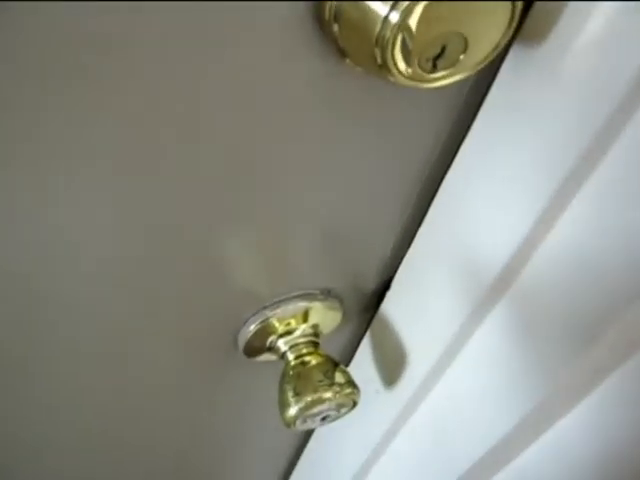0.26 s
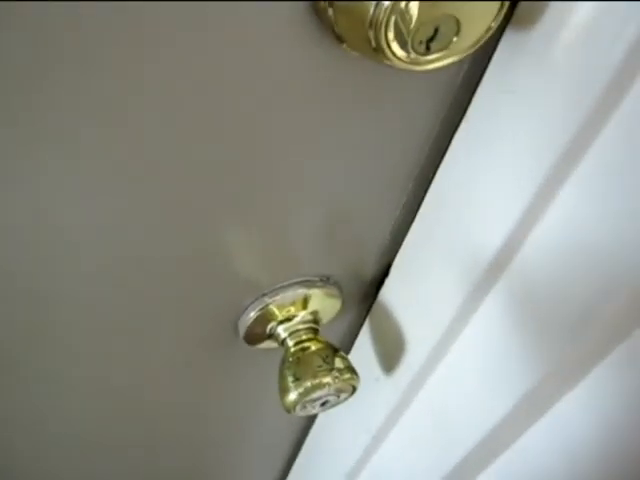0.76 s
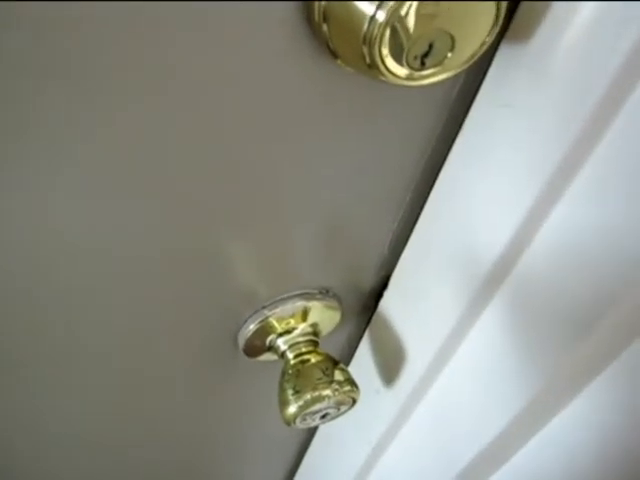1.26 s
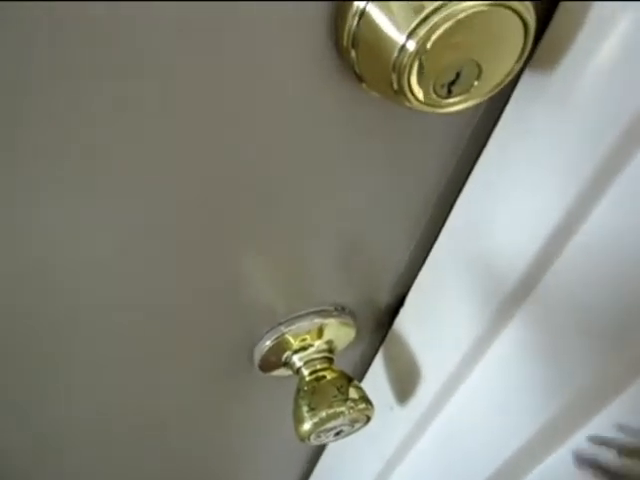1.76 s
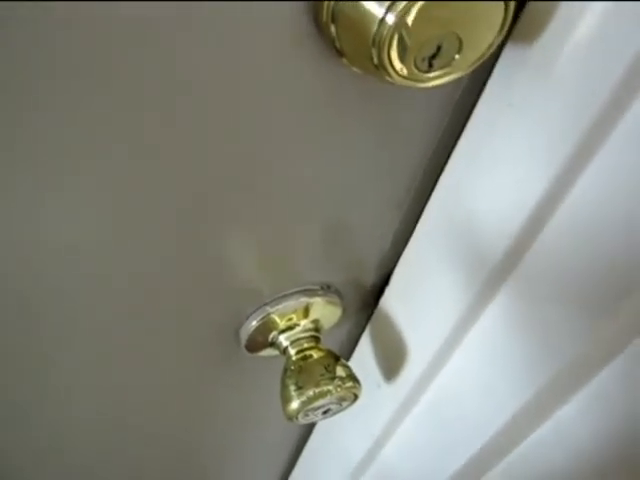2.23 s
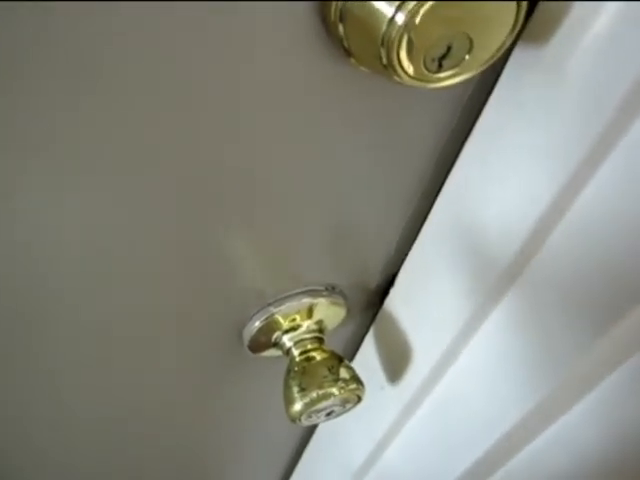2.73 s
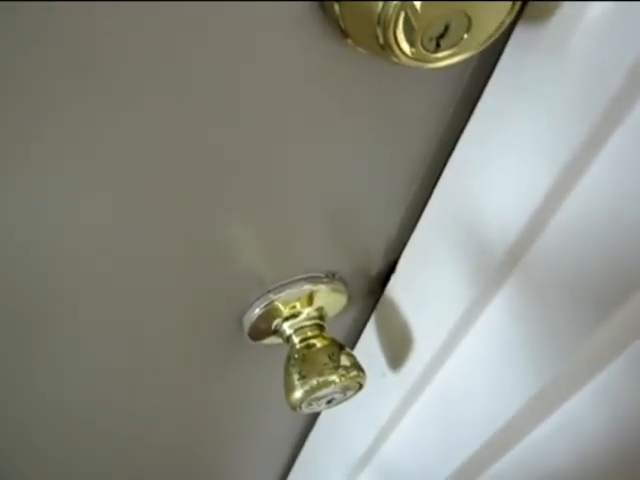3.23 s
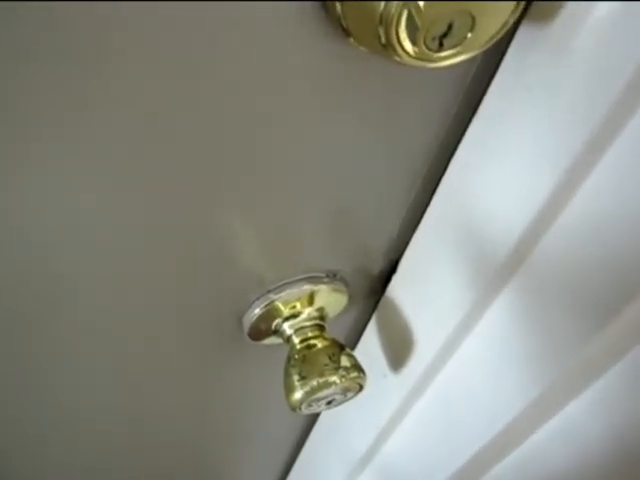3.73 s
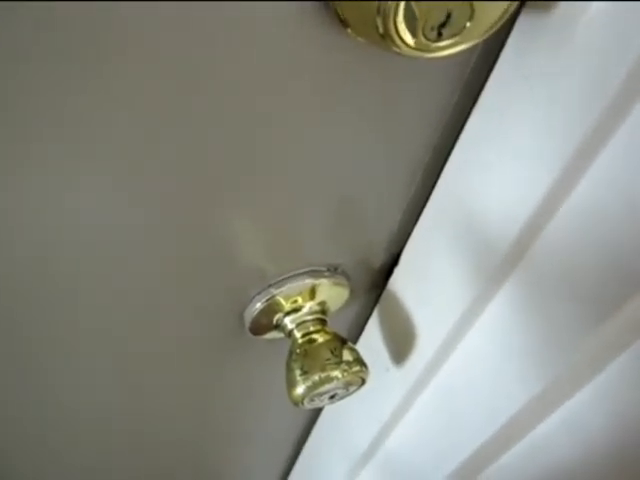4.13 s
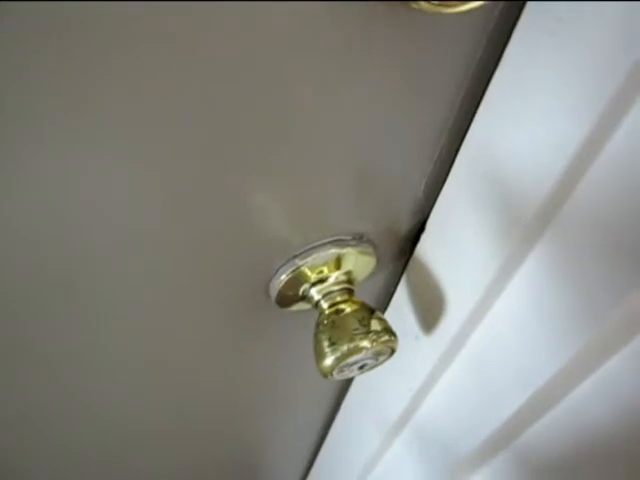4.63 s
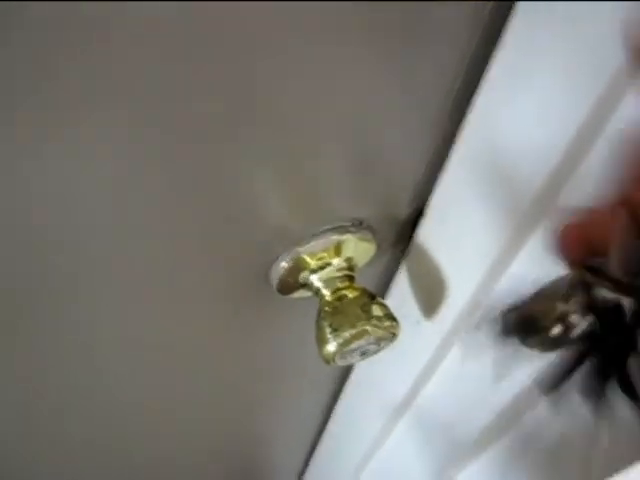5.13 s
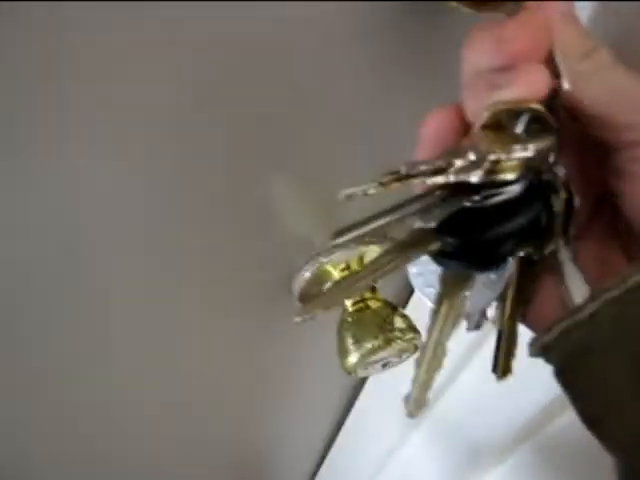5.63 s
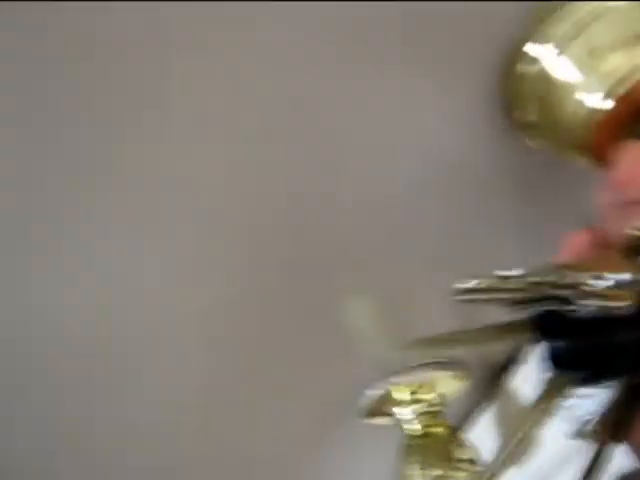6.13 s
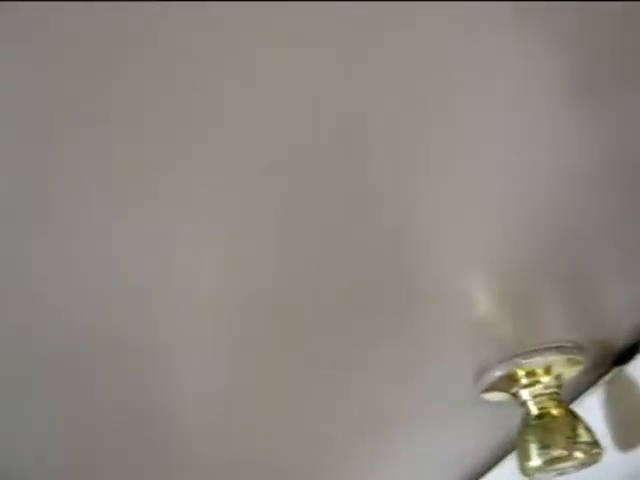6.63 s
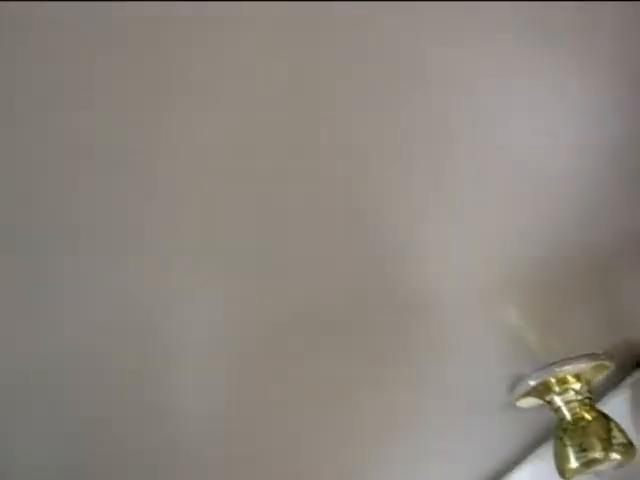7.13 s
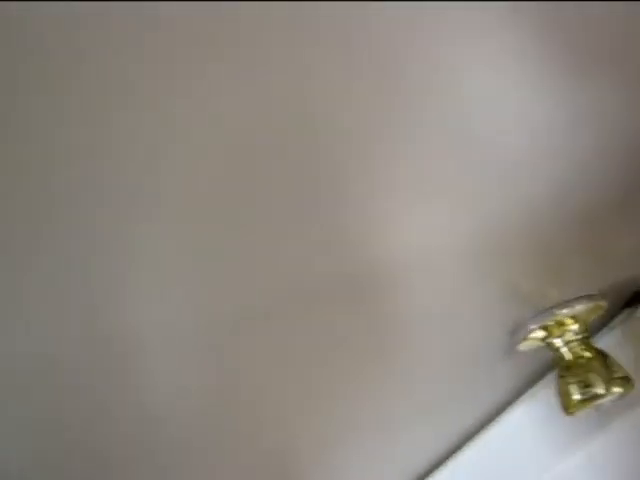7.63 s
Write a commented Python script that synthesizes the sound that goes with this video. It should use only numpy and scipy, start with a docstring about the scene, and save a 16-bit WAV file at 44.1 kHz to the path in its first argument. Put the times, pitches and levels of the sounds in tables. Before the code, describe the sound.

Close, gritty rustling cloth with bright key clicks and a brief scrape, then a key strikes a lock and the door booms open.

```python
"""Keys click, scrape and ring as they are dug out of a pocket beside a small camera: damped metal partials over noise.
A key goes into the lock, the bolt knocks over and the door thumps open (struck modes); cloth rustles (tiny slips).
The hand rumbles on camera and door; a low hum and a thin whine sink away when the rustle falls quiet.
The camera stores sound at a low rate in coarse steps: quiet sounds crackle, the quietest drop to silence."""
import sys
import numpy as np
from scipy import signal
from scipy.fft import rfft, irfft, next_fast_len
from scipy.io import wavfile
from scipy.ndimage import map_coordinates

SR = 44100
rng = np.random.default_rng(int(sys.argv[2]) if len(sys.argv) > 2 else 0)


def unload_wav(signal):
    """Save mono or channel-first audio to the path in sys.argv[1] as 16-bit WAV at rate SR, clipped to [-1, 1]."""
    wavfile.write(
        sys.argv[1],
        SR,
        np.round(np.clip(np.atleast_2d(signal).T, -1, 1) * 32767).astype(np.int16),
    )


N = 347067
TIME = np.arange(N) / SR
DECIMATE, STEP = 4, .0177  # stored: every 4th sample, in steps of this amplitude
STORED_TOP_HZ = SR / DECIMATE / 2
HELD_FROM_S, HELD_UNTIL_S = 5.35, 7.3  # the bunch is held to the lock
SPAN_ATTACK_S, SPAN_RELEASE_T60_S = 0.017, .06
BRUSH_ATTACK_S, BRUSH_RELEASE_T60_S = 0.0081, 0.072


def amp(db):
    """Decibels to gain."""
    return 10 ** (np.asarray(db) / 20)


def unit(x):
    """Scale to rms 1."""
    return x / np.sqrt(np.mean(x ** 2) + 1e-20)


def curve(rows):
    """One value per sample from (s, value) rows."""
    return np.interp(TIME, *np.transpose(rows))


def wobble(rate_hz):
    """Smooth random curve, rate_hz knots a second."""
    knots = rng.standard_normal(int(N * rate_hz / SR) + 4)
    return map_coordinates(knots, [TIME * rate_hz])


def filtered(x, response):
    """Multiply the spectrum of x by a response of frequency."""
    m = next_fast_len(len(x) + 4096)
    hz = np.fft.rfftfreq(m, 1 / SR)
    return irfft(rfft(x, m) * response(hz), m)[:len(x)]


def coloured(x, points):
    """Filter x by (Hz, dB) points on a log frequency axis."""
    point_hz, db = np.transpose(points)
    return filtered(x, lambda hz: amp(np.interp(np.log(hz + 1), np.log(point_hz), db)))


def resonance(f, centre_hz, width_hz):
    """Causal band-pass response of one resonance."""
    return 1j * f * width_hz / (centre_hz ** 2 - f ** 2 + 1j * f * width_hz)


def add(track, start_s, sound):
    """Mix a sound into the track at start_s."""
    room = track[round(start_s * SR):][:len(sound)]
    room += sound[:len(room)]


def held_to_lock():
    """True while the bunch is held to the lock."""
    return (TIME > HELD_FROM_S) & (TIME < HELD_UNTIL_S)


def friction(rate_hz, life_s, spread_db, smooth):
    """Noise of rms 1 made of tiny slips, each a puff that dies fast, over a smooth share."""
    slip_db = spread_db * np.clip(rng.standard_normal(N), -2, 2)
    slips = (rng.random(N) < rate_hz / SR) * amp(slip_db) ** 2
    power = signal.lfilter([1], [1, -np.exp(-2 / (life_s * SR))], slips)
    return unit(np.sqrt(power / power.mean() + smooth) * rng.standard_normal(N))


def span_gain(rows, attack_s, release_t60_s):
    """Gain of spans that set in, rise or fall evenly in dB, then die away; their powers add."""
    power = np.zeros(N)
    for start_s, length_s, level_db, swell_db in rows:
        t = TIME - start_s
        swell = swell_db * (np.clip(t / length_s, 0, 1) - 1)
        release = -60 * np.clip((t - length_s) / release_t60_s, 0, 2)
        power += (np.clip(t / attack_s, 0, 1) * amp(level_db + swell + release)) ** 2
    return np.sqrt(power)


def struck(blows, modes, trim_db, scatter_db, attack_s=.0001, longest_t60_s=1):
    """Every blow rings the same modes at new strengths and random polarity."""
    out, t = np.zeros(N), np.arange(SR // 2) / SR
    for start_s, level_db in blows:
        ring = np.zeros(len(t))
        for hz, mode_db, t60_s in modes:
            sign = rng.choice([-1, 1])
            fade_db = -60 * t / min(t60_s, longest_t60_s)
            strength_db = mode_db + scatter_db * rng.standard_normal()
            ring += sign * amp(strength_db + fade_db) * np.sin(2 * np.pi * hz * t)
        add(out, start_s, amp(level_db + trim_db) * (1 - np.exp(-t / attack_s)) * ring)
    return out


# hum ceiling: time_s, level_db
HUM_LEVEL = [(0, -65), (1, -53.5), (1.4, -61.5), (3, -55.5), (3.6, -45.5), (4.6, -41), (5.3, -63.5),
             (5.7, -56), (6.3, -43.5), (6.8, -55.5), (7.87, -60)]


def hum(rustle_gain, low_hz=65.4, high_hz=105, high_db=-9, under_db=-2):
    """Two low sines, capped below the rustle gain, so they sink away when it falls."""
    tone = np.sin(2 * np.pi * low_hz * TIME) + amp(high_db) * np.sin(2 * np.pi * high_hz * TIME)
    return np.minimum(amp(curve(HUM_LEVEL)), rustle_gain * amp(under_db)) * unit(tone)


def whine(rustle_gain, low_hz=3145, high_hz=3175, under_db=-10, loudest_db=-51, flutter_rad=.15, waver_db=1.5):
    """Two close, fluttering sines that sink away when the rustle falls quiet."""
    pair = np.zeros(N)
    for hz in (low_hz, high_hz):
        flutter = flutter_rad * (wobble(30) + wobble(300))
        pair += np.sin(2 * np.pi * hz * TIME + flutter)
    level = np.minimum(rustle_gain * amp(under_db), amp(loudest_db))
    return level * unit(amp(waver_db * wobble(16)) * pair)


# rumble spectrum: freq_hz, density_db (per Hz, relative)
RUMBLE_SPECTRUM = [(20, -16.5), (45, -6), (80, -4), (110, -1), (160, -1.5), (200, -5), (320, -6),
                   (500, -17), (1200, -36.5)]
# rumble gain on the rustle gain: time_s, gain_db
SHAKE_GAIN = [(0, -9), (1.1, -5.5), (1.4, -8.5), (2.6, -0.5), (3, -5), (4.5, -2.5), (5.15, -9.5),
              (5.45, -2.5), (5.66, 3), (5.95, 3), (6.3, 0), (6.8, -1.5), (7.15, 3), (7.4, 1), (7.87, -4.5)]


def handling(spans, brushes, brush_db=-3.5, lumps_db=2.5):
    """Hand on camera and door: low, lumpy noise that follows the rustle gain, less for brushes."""
    shake = np.hypot(spans, amp(brush_db) * brushes) * amp(curve(SHAKE_GAIN))
    lumps = amp(lumps_db * wobble(40))
    return shake * unit(lumps * coloured(rng.standard_normal(N), RUMBLE_SPECTRUM))


# cloth spectrum: freq_hz, density_db (per Hz, relative)
CLOTH_SPECTRUM = [(60, -37.5), (300, -2), (700, 1), (1500, -1), (2400, 3), (3200, -2), (4500, -1.5),
                  (5400, -1.5)]


def cloth(rustle_gain, trim_db=2.5, dull_hz=4300, dull_share=0.53, catch_hz=170, faint_db=-45.5):
    """Pocket and sleeve rub in small slips, stutter where faint; the sleeve alone, at the lock, is duller."""
    slips = friction(rate_hz=300, life_s=0.0021, spread_db=2, smooth=0.41)
    slips = slips + .45 * friction(rate_hz=70, life_s=.002, spread_db=2, smooth=0)
    rustle = unit(coloured(slips, CLOTH_SPECTRUM))
    treble = filtered(rustle, lambda f: f ** 6 / (f ** 6 + dull_hz ** 6))
    faintness = 1 / (1 + (rustle_gain / amp(faint_db)) ** 4)
    stutter_db = 3.5 * faintness * np.clip(wobble(catch_hz), -2, 1)
    return rustle_gain * amp(trim_db + stutter_db) * (rustle - dull_share * held_to_lock() * treble)


# blows on the door: start_s, level_db (before trim)
DOOR_BLOWS = [(5.614, -23.5), (5.739, -28.5), (5.829, -30), (5.868, -29), (5.905, -28.5), (5.974, -22),
              (5.995, -24.5), (6.045, -26), (6.744, -21), (6.952, -20), (6.96, -14), (7.069, -14),
              (7.107, -14), (7.316, -35), (7.445, -30.5), (7.69, -25.5)]
# modes of the free leaf: freq_hz, level_db (relative), t60_s
DOOR_MODES = [(121, -3, .07), (142.8, -2.5, .09), (201.6, 0, .29), (285, -1.5, 0.048), (351.7, -4, 0.055),
              (475, -8, 0.045), (613.6, -9.5, 0.074), (651, -8, .07)]
# leaf dragging through its frame: start_s, length_s, final_level_db, swell_db
FRAME_DRAGS = [(6.965, 0.079, -36, -7.5), (7.055, 0.076, -32, 0.5)]
FREE_FROM_S, CAUGHT_S, DAMPED_T60_S = 7.09, 7.6, .09  # frame damps the leaf before, hand after


def door(trim_db=-3, scatter_db=1.5, attack_s=.002, drag_width_hz=55):
    """The leaf thuds dully while frame or hand hold it, rumbles as it drags out, booms while it swings free."""
    free_blows = [blow for blow in DOOR_BLOWS if FREE_FROM_S <= blow[0] < CAUGHT_S]
    damped_blows = [blow for blow in DOOR_BLOWS if not FREE_FROM_S <= blow[0] < CAUGHT_S]
    thuds = struck(damped_blows, DOOR_MODES, trim_db, scatter_db, attack_s, DAMPED_T60_S)
    booms = struck(free_blows, DOOR_MODES, trim_db, scatter_db, attack_s)

    def leaf(f):
        return sum(amp(db) * resonance(f, hz, drag_width_hz) ** 2 for hz, db, _ in DOOR_MODES)

    rumble = unit(filtered(rng.standard_normal(N), leaf))
    return thuds + booms + span_gain(FRAME_DRAGS, SPAN_ATTACK_S, SPAN_RELEASE_T60_S) * rumble


# key hits the lock cylinder: start_s, level_db (before trim)
CYLINDER_STRIKES = [(5.6152, -16.5)]
# cylinder modes: freq_hz, level_db (relative), t60_s
CYLINDER_MODES = [(229, -5, .03), (925, -13.5, 0.039), (1500, -12, 0.017), (1976, -0.5, .02),
                  (2700, 2, 0.022), (2940, -15, .012), (4980, -4, 0.0064)]
# short knocks of the lock, and two late ones from door or seal: start_s, level_db (before trim)
SHORT_KNOCKS = [(6.099, -25), (6.107, -33.5), (6.255, -24), (7.698, -29.5), (7.712, -36)]
# modes shared by the short knocks: freq_hz, level_db (relative), t60_s
KNOCK_MODES = [(395, 13, 0.0056), (666, -3, 0.085), (770, 5, 0.06), (827, -5, 0.074), (1080, -2.5, 0.028),
               (1160, -7.5, 0.014), (1600, -6, 0.044), (1890, -5, 0.05), (2630, -18, 0.017)]


def lock_and_late_knocks():
    """The key strike rings the cylinder; short knocks of lock, then door or seal, share one set of modes."""
    cylinder = struck(CYLINDER_STRIKES, CYLINDER_MODES, trim_db=2.0, scatter_db=3.5)
    return cylinder + struck(SHORT_KNOCKS, KNOCK_MODES, trim_db=-2.0, scatter_db=2.5)


def stray_ticks(rustle_gain, rate_hz=65, level_db=-52, present_db=-62):
    """Keys touch faintly at random wherever there is any rustle."""
    present = rustle_gain > amp(present_db)
    return present * amp(level_db) * friction(rate_hz, life_s=0.0009, spread_db=0.5, smooth=0)


def small_ticks(spans, brushes, brush_db=1.5, tick_hz=5000, width_hz=1100, trim_db=-8, held_db=-6.5):
    """The rest of the bunch ticks at random, following the rustle gain, less while held to the lock."""
    gain = np.hypot(spans, amp(brush_db) * brushes)
    slips = friction(rate_hz=45, life_s=.0008, spread_db=3.0, smooth=0)
    ticks = filtered(slips, lambda f: resonance(f, tick_hz, width_hz))
    return gain * amp(trim_db + held_db * held_to_lock()) * unit(ticks)


# key dragged along an edge: time_s, level_db (before trim)
SCRAPE_LEVEL = [(2.516, -64), (2.52, -21), (2.54, -39), (2.585, -28.5), (2.66, -30), (2.685, -43.5),
                (2.72, -44), (2.729, -24), (2.738, -42.5), (2.85, -38), (2.88, -67)]
# resonances of the scraping key: freq_hz, width_hz, level_db (relative)
SCRAPE_RESONANCES = [(393, 400, -7.5), (1002, 140, 0.5), (1186, 46, 2), (2357, 130, -1), (3044, 130, -10.5),
                     (3752, 130, -3.5), (4916, 140, -12.5)]


def scrape(trim_db=-1, waver=.026):
    """A dragged key chatters into a few resonances, which waver as the point of contact moves."""
    slips = friction(rate_hz=380, life_s=0.0016, spread_db=6, smooth=0.25)

    def key_body(f):
        modes = enumerate(SCRAPE_RESONANCES)  # alternating polarity
        return sum((-1) ** k * amp(db) * resonance(f, hz, width_hz) for k, (hz, width_hz, db) in modes)

    body = filtered(slips, key_body)
    body = map_coordinates(body, [np.cumsum(1 + waver * wobble(25))])  # varying read speed
    return amp(curve(SCRAPE_LEVEL) + trim_db) * unit(body)


# short pitched sounds (key rings, a squeak, low knocks): start_s, pitch_hz, level_db, free_s (until damped)
PITCHED_SOUNDS = [(1.499, 4270, -27, 0.0097), (1.508, 1405, -36.5, 0.024), (1.512, 690, -28, 0.0094),
                  (1.527, 4110, -26.5, .008), (1.7, 4775, -32.5, 0.0092), (1.748, 4230, -29, 0.0039),
                  (1.835, 2697, -38.5, 0.021), (2.518, 767, -25.5, 0.0018), (3.154, 1430, -30.5, 0.017),
                  (3.576, 5030, -21.5, 0.0037), (3.658, 5075, -20.5, 0.0081), (4.701, 4050, -26, 0.001),
                  (4.837, 4980, -27, 0.0076), (4.891, 5050, -30.5, 0.056), (4.921, 1430, -32, 0.039),
                  (4.952, 4490, -34.5, 0.091), (5.025, 1637, -27.5, 0.045), (5.257, 4510, -35, 0.021)]


def pitched_sounds(t60_s=0.88, damped_t60_s=0.034, buzz_rad=0.098, flutter_db=2, drift=.003):
    """Key rings, a squeak and low knocks: each sounds on one drifting, buzzing pitch, then is damped."""
    out, t = np.zeros(N), np.arange(SR // 5) / SR
    buzz = buzz_rad * wobble(350)
    flutter = amp(flutter_db * wobble(120))
    speed = 1 + drift * wobble(40)
    for start_s, pitch_hz, level_db, free_s in PITCHED_SOUNDS:
        fade_db = -60 * (t / t60_s + np.maximum(t - free_s, 0) / damped_t60_s)
        first = round(start_s * SR)
        span = slice(first, first + len(t))
        phase = 2 * np.pi * pitch_hz * np.cumsum(speed[span]) / SR + buzz[span]
        add(out, start_s, amp(level_db + fade_db) * np.sin(phase))
    return flutter * out


# small metal contacts: start_s, level_db, pitch_hz, knock_db, rattle_s (levels before trim)
CONTACTS = [(0.004, -26, 4260, -42.5, 0), (0.0282, -39.5, 4770, -49, 0.0),
            (0.0565, -36.5, 3920, -44.5, 0.01), (0.1347, -38, 4860, -47.5, 0.003),
            (0.2096, -30, 5220, -39.5, 0.0024), (0.229, -25.0, 3756, -45, 0.0031),
            (0.2755, -31.5, 4950, -49, 0.0045), (0.3235, -32, 3870, -41.5, 0.0096),
            (0.3396, -24.5, 4260, -36, 0.00025), (0.6064, -33.5, 4550, -47, 0.007),
            (0.6254, -23, 3470, -35.5, 0.005), (0.7511, -23.5, 4800, -39.5, 0.0056),
            (0.7663, -27.5, 3730.0, -37.5, 0.005), (0.806, -30, 3670, -40, 0.0029),
            (0.819, -35.5, 4470, -48, 0.0014), (0.8969, -34, 2065, -48, 0.003),
            (0.9438, -36, 2800, -33.5, 0.00013), (1.0156, -33, 4060, -41, 0.002),
            (1.0709, -29, 2620, -38.5, 0.0067), (1.081, -24.5, 4110, -37.5, 0.0019),
            (1.481, -28.5, 4680, -31, 0.003), (1.4971, -23, 4470, -37, 0.0054),
            (1.506, -27.5, 4390, -43, 0.0051), (1.5263, -33, 4000, -28.5, 0.011),
            (1.5483, -30, 3960, -30, 0.0061), (1.5977, -28, 3850, -29, 0.0055),
            (1.653, -43.0, 3140, -52, 0.011), (1.6986, -28, 4500, -38, 0.004),
            (1.7465, -30.5, 4190, -35, 0.008), (1.787, -39.5, 3460, -43.5, 0.003),
            (1.8008, -38.5, 4080, -48, 0.014), (1.836, -34.5, 2950, -37, 0.005),
            (1.932, -36.5, 4640, -47, 0.005), (2.0236, -29, 3340, -49, 0.00056),
            (2.0466, -37, 4620, -52.5, 0.0077), (2.0675, -24.5, 4380, -39, 0.003),
            (2.1072, -28, 5050, -55, 0.0), (2.1603, -32, 4030, -54, 0.003),
            (2.1766, -32.5, 4880, -43, 0.013), (2.1978, -30, 2750, -45, 0.0011),
            (2.2636, -41, 4270, -45, 0.004), (2.3346, -33, 5250, -40, 0.003),
            (2.4343, -24.0, 4610, -34.5, 0.009), (2.4579, -25.5, 3940, -32.5, 0.0011),
            (2.465, -32, 4130, -30, 0.0055), (2.4969, -24.5, 5000.0, -44, 0.0033),
            (2.5232, -27.5, 4080, -32, 0.0034), (2.667, -27.5, 3680, -28.5, 0.0029),
            (2.8481, -27.5, 3980, -34.5, 0.003), (3.1297, -32.5, 4170, -34, 0.003),
            (3.155, -27.5, 4240, -36, 0.0012), (3.3034, -29, 5370, -48, 0.004),
            (3.331, -35, 5210, -51.5, 0.00017), (3.3978, -33, 4800, -53, 0.0078),
            (3.4115, -33.5, 4800, -54, 0), (3.5178, -30, 4760, -31, 0), (3.5244, -25.5, 4830, -34, 0.003),
            (3.593, -27.5, 5110, -48, 0.0), (3.658, -24.5, 4700, -44.5, 0.003),
            (3.6761, -25.5, 5240, -56.5, 0.0064), (3.6963, -27.5, 4450, -57.5, 0.000062),
            (3.749, -30, 3870, -45.5, 0.0026), (3.7826, -29, 4600, -45.5, 0.0054),
            (3.832, -26, 4630, -44, 0.0), (4.0341, -30, 3590, -47, 0.006), (4.0517, -25, 3590, -40, 0.009),
            (4.2091, -27, 5330, -46, 0.006), (4.2352, -31, 4310, -40, 0.0061),
            (4.257, -21.5, 5000, -36.5, 0.019), (4.2788, -24, 5370, -41, 0.004),
            (4.3548, -26, 4860, -45, 0.008), (4.4253, -28.5, 3030, -41, 0), (4.529, -29, 4980, -41, 0.0049),
            (4.614, -27.5, 4150, -41, 0.014), (4.634, -21, 5480, -35, 0.0041), (4.699, -23, 4100, -38.5, 0),
            (4.73, -25.5, 4400, -27.5, 0.016), (4.746, -23, 4090, -41.5, 0.0),
            (4.8367, -26, 4870, -38, 0.003), (4.857, -22.5, 5100, -34, 0.0013),
            (4.862, -23, 5210, -33, 0.0026), (4.8905, -29, 3150, -40, 0.003),
            (4.9539, -26.5, 4150, -31, 0.006), (5.1517, -33.5, 4290, -41.5, 0.004),
            (5.2539, -29, 3380, -36.5, 0.0061), (5.2852, -23, 3720, -33, 0.013),
            (5.6109, -19, 4360, -37, 0.0025), (5.615, -21.5, 2780, -30, 0.0015),
            (5.8775, -31, 2920, -38, 0.0031), (6.0171, -30, 3170, -37, 0.0),
            (6.0326, -25.5, 2770, -38, 0.0036), (6.0977, -33.5, 1836, -25.5, 0.008),
            (6.1665, -33, 3220, -34, 0), (6.2538, -21, 2960, -24, 0.0039),
            (6.3989, -27.5, 3690, -50.5, 0.0042), (6.4248, -27.5, 4155, -44.5, 0.00078),
            (6.434, -26.5, 3720, -32.5, 0.0), (6.473, -41, 4900, -53.5, 0.0023),
            (6.5143, -38.5, 3850, -54.5, 0), (6.7533, -27.5, 4220, -34, 0.0014),
            (6.762, -32, 4400, -45, 0.0011), (6.7991, -32, 3700, -43, 0.0),
            (6.8279, -27, 3090, -47, 0.0048), (6.9072, -28, 3060, -44.5, 0.009),
            (7.071, -20.5, 3680, -32, 0.0077), (7.089, -22.5, 2740, -36, 0.0014),
            (7.1099, -23, 2750, -37, 0.0046), (7.124, -23, 3060, -31.5, 0.0042),
            (7.1495, -31.5, 3480, -51, 0.011), (7.1913, -28, 2590, -43, 0.004),
            (7.345, -22, 4690, -37.5, 0.0054), (7.397, -22.5, 4500, -36, 0.003),
            (7.4112, -30, 5320, -44, 0), (7.425, -35, 4570, -52, 0.0027), (7.4379, -25, 2810, -45, 0.0058),
            (7.449, -30, 2470, -37, 0.0034), (7.4803, -29, 4460, -33.5, 0.003),
            (7.6001, -27, 2770, -34.5, 0.003), (7.707, -23, 4980, -37, 0.004),
            (7.7393, -34, 4370, -46, 0.0038)]


def clicks(rattle_hz=450, rattle_db=3.5, sag_db=-6, snap_t60_s=.007, tail_t60_s=0.038, tail_db=-16,
           width=0.42, crack_db=-9, ring_t60_s=0.027, ring_db=-6, ring_spread=.25,
           body_hz=720, body_width_hz=1100, body_t60_s=0.013, body_trim_db=-13, trim_db=-13):
    """Each contact rattles and dies: broad crack, pitched snap, damped metal partials, duller knock."""
    out, t = np.zeros(N), np.arange(SR // 10) / SR
    chatter = amp(rattle_db * np.clip(wobble(rattle_hz), -1.5, 1.5))
    for start_s, level_db, pitch_hz, knock_db, rattle_s in CONTACTS:
        after_s = np.maximum(t - rattle_s, 0)
        sag = amp(sag_db * np.clip(t / (rattle_s + .001), 0, 1))
        rattle = chatter[round(start_s * SR):][:len(t)] * sag
        decay = rattle * (amp(-60 * after_s / snap_t60_s) + amp(tail_db - 60 * after_s / tail_t60_s))
        bright, broad, dull = rng.standard_normal((3, len(t)))
        snap = unit(filtered(decay * bright,
                             lambda f: resonance(f, pitch_hz, width * pitch_hz) * (f < STORED_TOP_HZ)))
        crack = unit(filtered(decay * broad, lambda f: f < STORED_TOP_HZ))
        # each key and point of contact has its own partials
        highest_hz = min(pitch_hz * np.exp(ring_spread), STORED_TOP_HZ)
        partials_hz = highest_hz * np.exp(-ring_spread * rng.exponential(size=(8, 1)))
        strengths = partials_hz * rng.standard_normal(partials_hz.shape)
        partials = np.sum(strengths * np.sin(2 * np.pi * partials_hz * t), axis=0)
        ring = unit(partials * amp(-60 * t / ring_t60_s))
        thud = rattle * amp(-60 * after_s / body_t60_s) * dull
        knock = unit(filtered(thud, lambda f: resonance(f, body_hz, body_width_hz) ** 2))
        metal = unit(snap + amp(crack_db) * crack + amp(ring_db) * ring)
        add(out, start_s, amp(level_db + trim_db) * metal + amp(knock_db + body_trim_db) * knock)
    return out


# rustle level spans: start_s, length_s, final_level_db, swell_db
RUSTLE_SPANS = [(0, 0.64, -38.5, 9), (.658, 0.29, -47.5, -4), (.925, 0.17, -39.5, 4),
                (1.28, 0.35, -39, 6.5), (1.65, .225, -57, -1), (2.28, 0.22, -43.5, 2.5),
                (2.53, 0.33, -41.5, 0.5), (2.86, 0.34, -43.5, 0), (3.2, 0.087, -56.5, -0.5),
                (3.285, 0.57, -43.5, 5), (3.865, 0.22, -47, 1.5), (4.085, 0.63, -33, 14),
                (4.735, 0.35, -38.5, 1.5), (5.135, 0.22, -42.5, 3.5), (5.35, 1.08, -38.5, 5),
                (6.5, 0.13, -43.5, 8.5), (6.625, 0.41, -33, 8.5), (7.14, 0.62, -40, 1),
                (7.765, 0.095, -37, 10)]
# quick brushes of the bunch on cloth, hand or door: start_s, length_s, level_db
QUICK_BRUSHES = [(0.599, 0.044, -38.5), (0.742, 0.025, -40.5), (1.485, 0.075, -32.5), (1.582, 0.022, -36),
                 (1.701, 0.011, -36), (1.746, 0.013, -39.5), (2.05, 0.04, -43.5), (2.157, 0.06, -41.5),
                 (3.123, 0.018, -32.5), (3.493, .035, -36), (4.036, 0.021, -36.5), (4.638, 0.022, -29.5),
                 (4.929, 0.084, -28.5), (5.269, 0.037, -32), (6.012, 0.075, -34), (6.978, 0.076, -33),
                 (7.05, 0.084, -27.5), (7.31, 0.035, -35), (7.653, 0.032, -35), (7.687, .03, -31.5)]


def scene():
    """One rustle gain drives cloth, ticks and rumble; all sources mix dry into one channel."""
    spans = span_gain(RUSTLE_SPANS, SPAN_ATTACK_S, SPAN_RELEASE_T60_S)
    brush_rows = [(*row, 0) for row in QUICK_BRUSHES]  # no swell
    brushes = span_gain(brush_rows, BRUSH_ATTACK_S, BRUSH_RELEASE_T60_S)
    rustle_gain = np.hypot(spans, brushes)
    background = hum(rustle_gain) + whine(rustle_gain) + handling(spans, brushes) + cloth(rustle_gain)
    ticks = stray_ticks(rustle_gain) + small_ticks(spans, brushes)
    foreground = scrape() + pitched_sounds() + clicks()
    return (background + door() + lock_and_late_knocks() + ticks + foreground)[None]


# playback filter, passing mirror images above half the stored rate: freq_hz, gain_db
PLAYBACK_FILTER = [(3500, 0), (4484, -.6), (5060, -1.8), (5512, -4), (5964, -7), (6535, -14), (7000, -24),
                   (7450, -41), (8000, -56), (9500, -68), (11000, -74), (12000, -58), (13300, -48),
                   (14900, -66)]


def record(dry, top_hz=14900):
    """Sample at a quarter of the rate, round to coarse steps, and smooth the steps again."""
    band = filtered(dry[0], lambda hz: hz < STORED_TOP_HZ)
    stored = np.zeros(N)
    # sound under half a step vanishes; just above it, single steps crackle
    stored[::DECIMATE] = DECIMATE * STEP * np.round(band[::DECIMATE] / STEP)
    played = filtered(coloured(stored, PLAYBACK_FILTER), lambda hz: hz < top_hz)
    # the converter rests one step below zero
    return played[None] - STEP


dry = scene()
out = record(dry)
unload_wav(out)
```